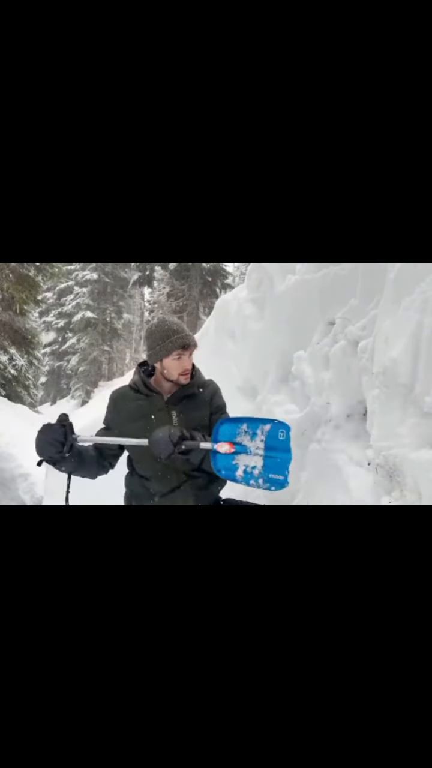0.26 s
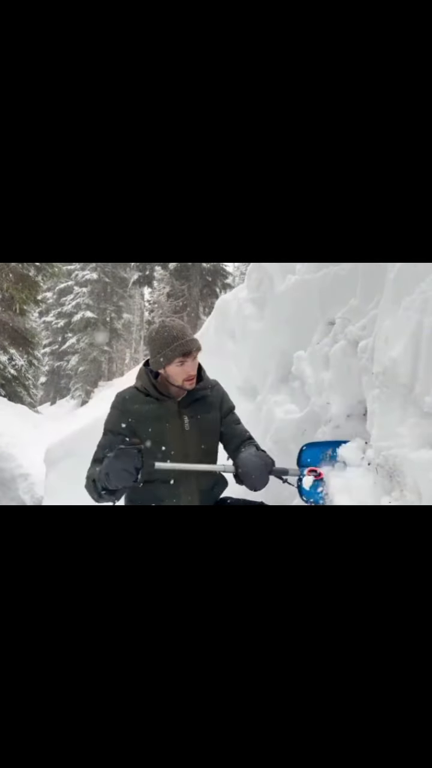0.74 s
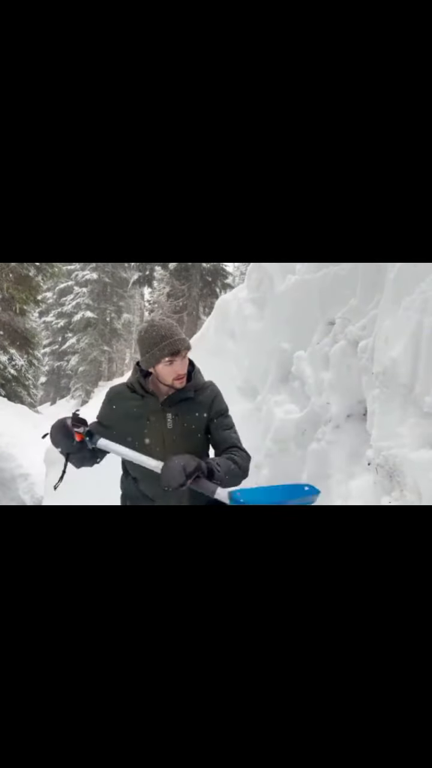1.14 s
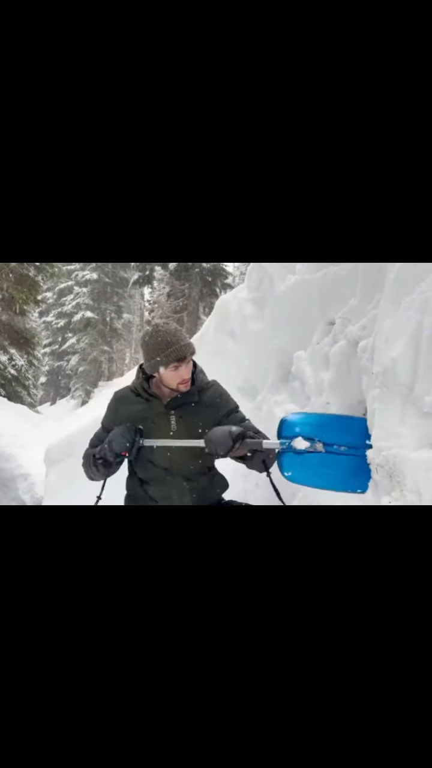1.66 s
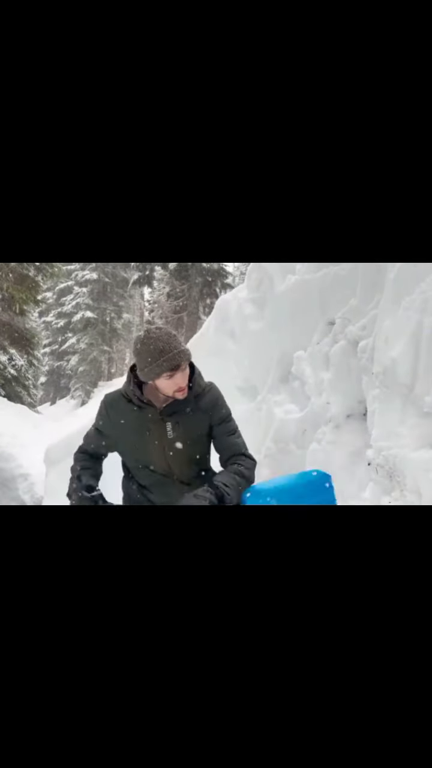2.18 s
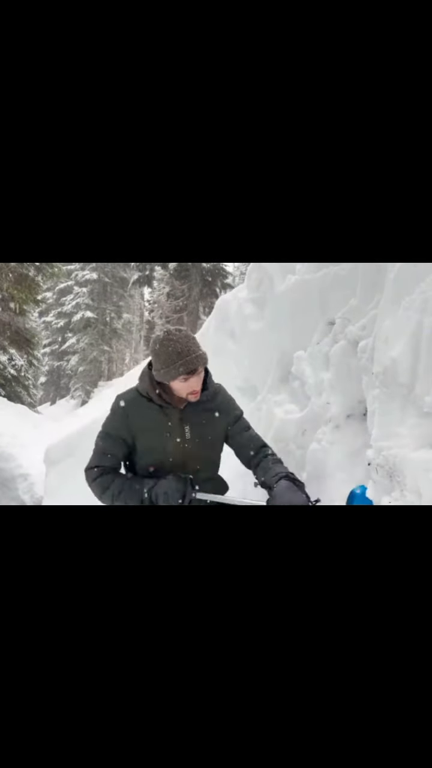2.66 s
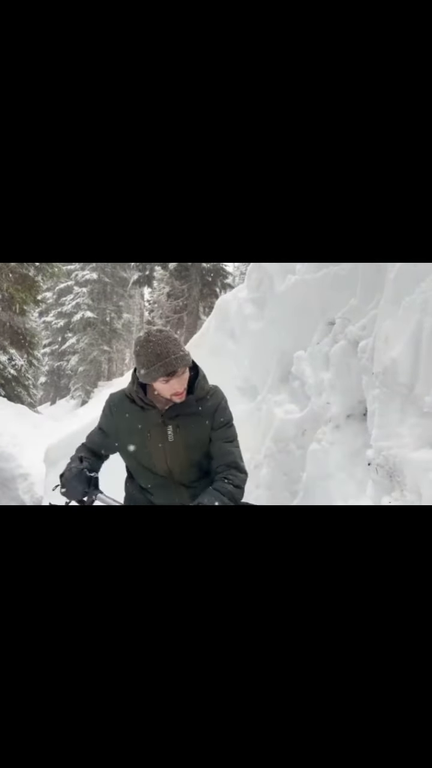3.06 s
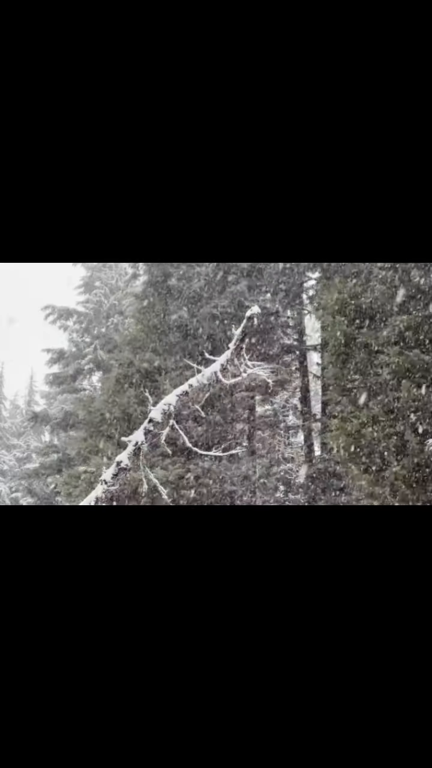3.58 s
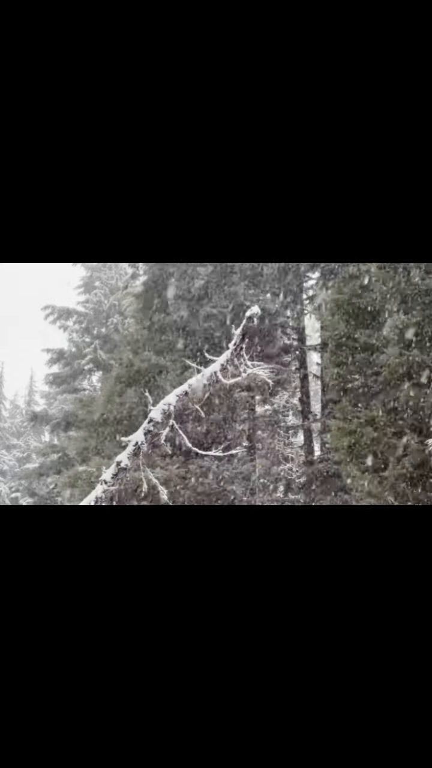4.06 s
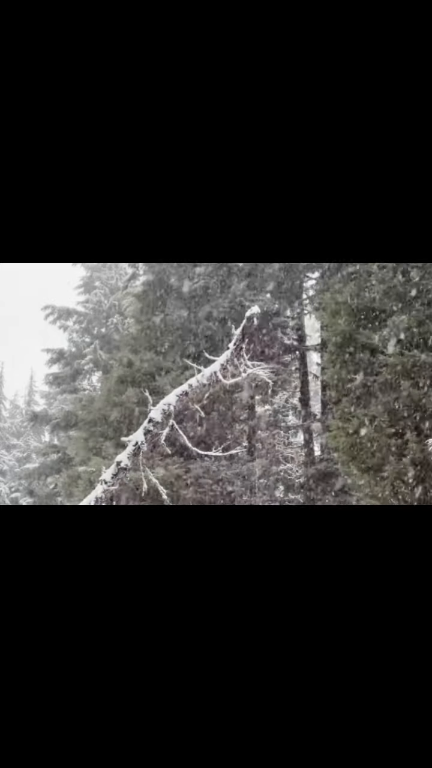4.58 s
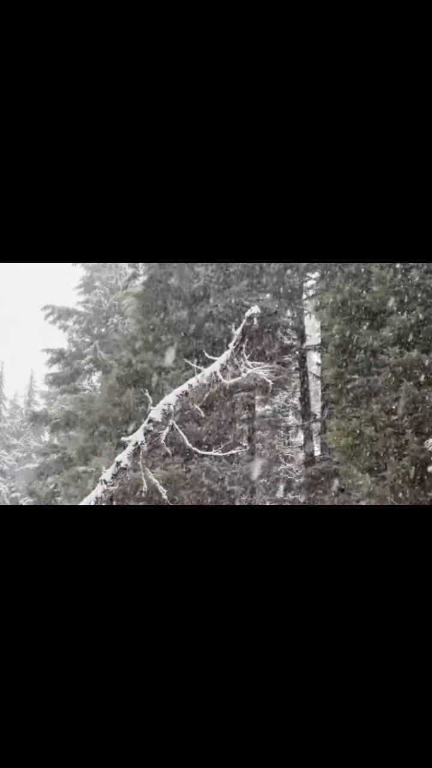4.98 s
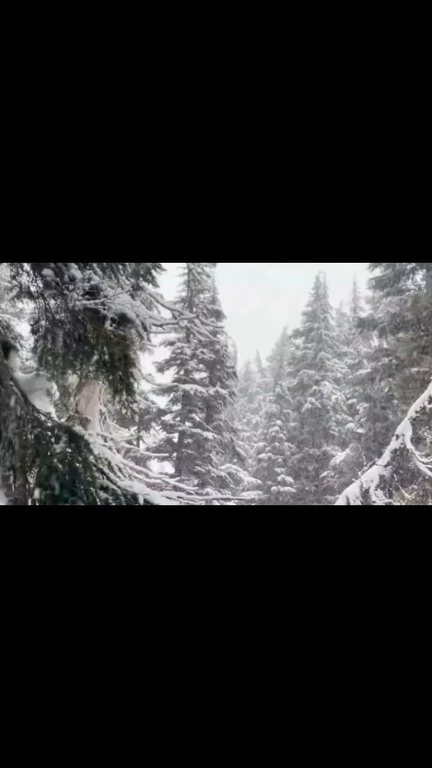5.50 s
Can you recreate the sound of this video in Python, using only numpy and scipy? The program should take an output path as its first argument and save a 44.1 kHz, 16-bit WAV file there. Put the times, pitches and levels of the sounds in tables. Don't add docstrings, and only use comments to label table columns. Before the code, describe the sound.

Outdoors in a still snowy wood, a blade bites packed snow in irregular strokes. Dense crystal crackle, a low boom of the sheet metal and fine hiss move together; dull knocks mark hard lumps and loosened blocks thump softly. Loud hits fall near two, four and five seconds, separated by small trickles. A small close stereo microphone hears it right of centre, the left duller, with watery compressed treble.

```python
import sys
import numpy as np
from scipy import signal
from scipy.fft import rfft, irfft
from scipy.io import wavfile
from scipy.ndimage import uniform_filter1d, minimum_filter1d, map_coordinates

SR = 44100
rng = np.random.default_rng(int(sys.argv[2]) if len(sys.argv) > 2 else 0)


def attenuation_scalar(level_db):
    decades = np.asarray(level_db, float) / 20
    return 10 ** decades


def unload_wav(signal):
    wavfile.write(
        sys.argv[1],
        SR,
        np.round(np.clip(np.atleast_2d(signal).T, -1, 1) * 32767).astype(np.int16),
    )


N = 253134
USUAL_DB = -35


def unit(x):
    return x / np.sqrt(np.mean(x ** 2) + 1e-20)


def along(points, hz):
    f, v = np.transpose(points)
    return np.interp(np.log(hz + 1), np.log(f + 1), v)


def wobble(rate):
    knots = rng.standard_normal(int(N * rate / SR) + 4)
    return map_coordinates(knots, [np.arange(N) * rate / SR])


def bump(s, half):
    return np.exp(-np.minimum(((np.arange(N) / SR - s) / half) ** 2, 50))


def patches(shape, tall, long):
    field = uniform_filter1d(rng.standard_normal(shape), tall, axis=0)
    return unit(uniform_filter1d(field, long, axis=1))


def coloured(x, spectrum, modes=()):
    m = 8192
    hz = np.fft.rfftfreq(m, 1 / SR)
    db = along(spectrum, hz) + sum(g / (1 + (2 * (hz - c) / w) ** 2) for c, w, g in modes)
    cep = irfft(np.log(attenuation_scalar(db) + 1e-6), m)
    cep[1:m // 2] *= 2
    cep[m // 2 + 1:] = 0
    response = irfft(np.exp(rfft(cep)), m)
    return signal.oaconvolve(x, response[None] / np.linalg.norm(response), axes=1)[:, :N]


def cracks(spike_db, clump_db, clumps):
    spikes = np.minimum(rng.exponential(size=N), 5.5)
    size = attenuation_scalar(spike_db * spikes + clump_db * wobble(clumps))
    return unit(size) * rng.standard_normal((2, N))


# start in seconds, length in seconds, from dB, to dB, blade body in dB against the crunch.
CUTS = [(0, 0.17, -31.5, -37, 3), (0.199, 0.14, -38.5, -38, -5.5), (0.44, 0.033, -34.5, -27.5, -15),
        (0.725, 0.015, -32, -27.5, -12), (0.894, 0.088, -46, -24, 1), (1.131, 0.085, -48, -35, -48),
        (1.337, 0.085, -47, -38.5, 1.5), (1.524, 0.13, -41, -20.5, 4.5), (1.66, 0.031, -34, -23, 4),
        (1.878, 0.076, -21, -12.5, 4.5), (2.088, 0.17, -36, -21.5, 5), (2.452, 0.028, -47.5, -37, -7),
        (2.653, 0.023, -37.5, -19.5, -2), (2.684, 0.051, -18, -19, -3), (2.79, 0.12, -39.5, -30.5, 10),
        (3.357, 0.021, -22.5, -14, -6.5), (3.626, 0.064, -29, -21, -3), (3.73, 0.026, -40, -38, -9),
        (3.988, 0.044, -33, -17, -23), (4.096, 0.11, -36.5, -31.5, 8), (4.433, 0.068, -41.5, -33.5, 13),
        (4.496, 0.12, -36.5, -21.5, -3.5), (5.02, .015, -33.5, -25, -14), (5.037, 0.047, -21, -13.5, -25),
        (5.266, 0.064, -38, -26.5, 1.5), (5.573, .014, -29.5, -23.5, -8)]
SLIDES = [(0.13, 0.083, -36, -39.5, 10.5), (0.528, 0.18, -37.5, -45, -5), (0.753, 0.16, -35.5, -48, 7),
          (0.991, 0.15, -25.5, -50, -0.5), (1.21, 0.11, -43, -47, 4.5), (1.439, 0.071, -63, -50, -12),
          (1.702, 0.093, -23, -22, 7), (1.949, 0.079, -9, -38, -4.5), (2.257, 0.15, -26, -46.5, -6.5),
          (2.9, 0.1, -27.5, -27, -4), (3.393, 0.14, -29.5, -31.5, 1), (3.773, 0.17, -39.5, -59, -2.5),
          (4.016, 0.096, -17, -36, 10.5), (4.227, 0.14, -28.5, -49.5, 1), (4.662, 0.1, -41, -49, -2),
          (4.744, 0.21, -54.5, -52, 4), (5.061, 0.09, -12, -29, 5.5), (5.337, 0.063, -29.5, -29.5, -6),
          (5.391, 0.14, -32, -45, -23), (5.593, 0.17, -21, -37.5, -3)]
TRICKLES = [
    (0.354, .07, -56, -48, -20),
    (2.5, 0.12, -55, -54, -6),
    (3.07, 0.21, -57.5, -67.5, -1.5),
    (3.564, 0.038, -49, -36.5, 2),
    (4.35, 0.1, -51, -50.5, -14),
    (5.178, 0.056, -45, -53, 8),
    (1.088, 0.039, -51, -58, -23),
    (3.92, .04, -52, -57, -19),
    (4.97, .03, -54, -49, -5),
]
# time in seconds, added left-right level in dB.
TURN = [
    (0, 1),
    (1.1, 3),
    (1.7, 1),
    (3.2, 2),
    (4.5, 1.5),
    (5.1, 3.5),
]


def effort():
    attack_db_per_s, release_db_per_s = 653, 440
    scatter_s, scatter_share = 0.011, 0.58
    t = np.arange(0, N / SR + .01, 1 / 1000)
    start, length, first, last, depth = np.transpose(CUTS + SLIDES + TRICKLES)[:, :, None]
    moves = first + (last - first) * np.clip((t - start) / length, 0, 1)
    moves = moves - attack_db_per_s * np.maximum(start - t, 0)
    moves = moves - release_db_per_s * np.maximum(t - start - length, 0)
    strongest = moves.max(axis=0)
    level = np.maximum(strongest, -72)
    weight = attenuation_scalar(moves - strongest)
    body = (weight * depth).sum(axis=0) / weight.sum(axis=0)
    keep = np.exp(-t[1] / scatter_s)
    lingering = signal.lfilter([1 - keep], [1, -keep], level - level[0]) + level[0]
    step = -9 + np.interp(t, *np.transpose(TURN)) - 0.05 * (level - USUAL_DB)
    step = np.clip(step + scatter_share * (lingering - level), -16, -2)
    return [np.interp(np.arange(N) / SR, t, curve) for curve in (level, body, step)]


# time in seconds, change in dB,
# half length in seconds.
SLIPS = [(0.107, 9.5, 0.022), (0.567, 5.5, 0.014), (0.657, 4, 0.0068), (0.92, 5.5, 0.038),
         (1.051, 4.5, 0.016), (1.166, 4, .0099), (1.281, 6, 0.012), (1.46, 16.5, 0.007),
         (1.49, 10.5, 0.0048), (2.146, 4.5, 0.026), (2.231, 3, 0.0042), (2.296, 4.5, 0.015),
         (2.544, 4, 0.0061), (2.656, 8, 0.0058), (2.692, 2, 0.007), (3.376, 3.5, 0.0058),
         (3.515, 2.5, .015), (3.777, 6.5, .003), (0.3, 4.5, .01), (0.736, 6, .006), (.057, 2.5, .004),
         (5.019, 4, 0.0043), (3.099, 12.5, 0.019), (3.165, 8, 0.015), (3.321, 6, 0.0083),
         (4.622, 5.5, 0.01), (4.747, 3, 0.0093), (4.9, 7, 0.0054), (4.813, 6, .008), (5.01, -1, 0.0086),
         (5.6, 5.5, 0.014), (5.692, 8, 0.014)]
# time in seconds, change in dB, half length in seconds.
CATCHES = [(1.174, -11, 0.0081), (1.36, -8, 0.021), (1.519, -6, 0.014), (1.612, -9.5, 0.0085),
           (1.756, -10.5, 0.014), (2.198, -2.5, 0.013), (4.137, -6.5, 0.0066), (2.209, -2, 0.005),
           (2.703, -1.5, 0.0073), (2.252, -2.5, 0.014), (3.4, -0.5, 0.0095), (3.472, -2.5, .012),
           (2, -2, .008), (0.039, -3.5, .01), (2.828, -12, 0.0063), (3.286, -7, 0.041), (5.451, -8, 0.019),
           (5.669, -3.5, 0.016)]


def jolts():
    return 1.32 * wobble(35) + sum(db * bump(s, half) for s, db, half in SLIPS + CATCHES)


# time in seconds, peak in dB,
# pitch in Hz, half length in seconds.
HUMS = [(0.01, -17, 439, 0.0061), (0.107, -18.5, 405, 0.0068), (0.13, -26, 329, 0.014),
        (.215, -19.5, 89.3, 0.0062), (0.47, -26.5, 52.5, 0.02), (0.561, -44, 350, 0.004),
        (2.49, -24, 85, 0.0072), (1.331, -36, 250, .02), (3.593, -33, 160, 0.0059),
        (2.488, -26.5, 190, .006), (2.693, -14.5, 280, 0.0048), (0.164, -33, 330, .008),
        (0.76, -22.5, 370.5, 0.0065), (2.28, -31, 330, .007), (2.774, -32, 299, .007),
        (3.102, -44.5, 802, 0.0061), (3.153, -61, 802, 0.033), (3.741, -27.5, 813, 0.0088),
        (3.757, -25.5, 800, 0.015), (4.362, -51, 814, 0.019), (4.53, -24, 170.4, 0.0064),
        (5.357, -35.5, 829, 0.054), (4.819, -52, 1760, .01), (5.604, -27.5, 283.5, 0.019),
        (5.678, -33, 299.5, 0.019),
        (0.19, -30, 238, 0.005), (0.567, -37, 439, 0.0044), (0.95, -35, 390, 0.0047),
          (0.966, -34, 398, 0.007), (0.989, -28, 446, 0.0049), (1.664, -24, 264, 0.0083),
          (1.696, -25, 294, 0.0076), (1.72, -16, 328, 0.007), (1.803, -19, 312, 0.0059),
          (1.896, -17, 337, 0.0057), (1.942, -19, 466, 0.0057), (1.978, -19.5, 478, 0.0064),
          (2.137, -20.5, 409, 0.0057), (2.154, -25.5, 515, 0.0061), (2.238, -24, 359, 0.006),
          (2.257, -29, 328, 0.0098), (2.73, -29, 358, 0.0045), (2.743, -27, 436, 0.007),
          (2.905, -28, 307, 0.007), (2.941, -29, 525, 0.0056), (3.38, -22.5, 358, 0.007),
          (3.527, -37, 503, 0.007), (3.663, -29, 385, 0.0054), (3.696, -26, 382, 0.007),
          (4.038, -27, 387, 0.007), (4.229, -21, 276, 0.0063), (4.266, -32, 347, 0.007),
          (4.47, -37, 391, 0.0061), (4.566, -33, 407, 0.0087), (4.584, -26, 463, 0.007),
          (4.627, -23, 422, 0.0061), (5.074, -25, 375, 0.0062), (5.12, -29, 445, 0.0059),
          (5.27, -35, 343, 0.007), (5.321, -23.5, 375, 0.0038), (5.651, -27, 319, 0.007)]


def hums():
    out, t = np.zeros(N + SR), np.arange(-SR // 4, SR // 4) / SR
    for s, db, hz, half in HUMS:
        swell = np.exp(-np.minimum((t / half) ** 2, 50))
        out[round(s * SR):][:len(t)] += attenuation_scalar(db) * swell * np.sin(2 * np.pi * hz * (t + s))
    return out[SR // 4:][:N]


# time in seconds, peak in dB.
SNAPS = [(0.054, -26), (0.0626, -30), (0.1126, -29), (0.1353, -31), (0.4542, -14.5), (0.467, -24),
         (0.564, -32), (0.7424, -12), (0.9976, -20), (1.1997, -29), (1.281, -34), (1.38, -31), (1.489, -33),
         (1.5372, -30), (1.5881, -26), (1.709, -20), (1.768, -23), (1.8676, -20), (1.8873, -24),
         (1.9061, -16), (1.96, -4), (2.1733, -24), (2.2173, -11.5), (2.2363, -16), (2.291, -27),
         (2.48, -22), (2.6888, -13), (2.7166, -8), (2.733, -19), (2.8893, -24), (2.9514, -24),
         (2.9908, -29), (2.999, -28), (3.006, -27), (3.3765, -21), (3.599, -23), (3.6661, -20),
         (3.7564, -22.5), (4.0156, -11), (4.0812, -21), (4.1562, -18), (4.4307, -25), (4.5176, -21),
         (4.5637, -19), (4.569, -17.5), (4.5788, -27), (4.619, -10.5), (5.082, -16), (5.311, -26),
         (5.3812, -25), (5.3964, -40), (5.4761, -30), (5.5952, -19), (5.6394, -22), (5.648, -31),
         (5.6889, -23)]


def snaps():
    bite_db, t60_s = -2.5, 0.0088
    bite, t = np.zeros(N + SR), np.arange(SR // 20) / SR
    for s, db in SNAPS:
        bite[round(s * SR):][:len(t)] += attenuation_scalar(db + bite_db - 60 * t / t60_s)
    return bite[:N]


# time in seconds, peak in dB, ring pitch in Hz,
# ring time to fall 60 dB in seconds, bite of snow in dB against the ring.
KNOCKS = [(1.377, -33, 252, 0.04, -0.5), (1.488, -51, 807, 0.01, 8), (1.588, -17, 220, 0.022, -24),
          (1.867, -9.5, 500, 0.023, -30), (2.084, -27, 420, 0.027, -35), (2.2168, -6.5, 400, 0.013, -16.5),
          (2.481, -28.5, 260, 0.018, 9), (2.8435, -15, 462, 0.011, -20), (3.35, -22, 980, 0.033, -1),
          (3.601, -23, 365, 0.021, -6), (3.754, -20, 766, 0.014, -2), (4.081, -2.5, 268, 0.023, -28),
          (4.381, -46, 775, 0.022, 17), (4.431, -26, 730, 0.026, -22)]
CHOPS = [(.055, -22, 343, 0.039, -5), (0.45, -22, 146, 0.031, -1.5), (0.724, -24.5, 390, 0.054, -1),
         (0.7413, -10, 320, 0.03, 1), (1.537, -25.5, 260, 0.054, 0), (1.627, -19, 265, 0.023, 0),
         (1.767, -12.5, 192, 0.057, -20), (2.661, -22, 970, 0.033, -3), (2.686, -16.5, 304, .036, -1),
         (4.012, -20, 250, .026, -2), (4.157, -4.5, 277, 0.024, -23.5), (4.515, -6, 387, 0.016, -12),
         (5.032, -25, 730, .03, 5), (5.478, -39, 366, 0.049, 15), (5.574, -33, 860, .02, -2)]


def knocks():
    glance_t60_s, break_t60_s = 0.033, 0.17
    rings, bite, t = np.zeros(N + SR), np.zeros(N + SR), np.arange(SR // 4) / SR
    blows = [(*row, glance_t60_s) for row in KNOCKS] + [(*row, break_t60_s) for row in CHOPS]
    for s, db, hz, t60, bite_db, bite_t60 in blows:
        here = slice(round(s * SR), round(s * SR) + len(t))
        phase = 2 * np.pi * hz * (0.724 * t + 1.217 * 0.00327 * (1 - np.exp(-t / 0.003)))
        fade = -60 * (t / t60) ** 1.71
        rings[here] += attenuation_scalar(db - 0.5 + fade) * np.sin(phase) * (1 - np.exp(-t / 0.0013))
        contact = (1 - t / 0.0005) * np.exp(-t / 0.0003) * (1 - np.exp(-t / .0001))
        rings[here] += attenuation_scalar(db - 13) * contact
        crush = 1.08 * attenuation_scalar(-60 * t / bite_t60) + attenuation_scalar(-60 * t / 0.0027)
        bite[here] += attenuation_scalar(db + bite_db - 11.5) * crush
    return rings[:N], bite[:N]


# centre in Hz, width in Hz, boost in dB.
BLADE = [(307, 630, 5), (796, 56, 4), (1760, 120, 1.5), (4840, 270, 4), (5310, 250, 1.5)]


def on_blade(x, spectrum):
    return coloured(x, spectrum, BLADE)


# frequency in Hz, level in dB per Hz.
CRUNCH = [(240, -32.5), (400, -11), (484, -8), (1060, -2.5), (1200, -5), (1720, -3), (3450, -10),
          (5000, -16), (6500, -42), (11000, -120)]


def crunch(push, bite, snap, click):
    force = push + bite + snap
    return on_blade(force * cracks(3.3, 0.47, clumps=170) + attenuation_scalar(12.5) * click, CRUNCH)


# frequency in Hz, level in dB per Hz.
BODY = [(59, -31), (100, -12), (140, -9), (306, -1.5), (654, -7), (786, -8.5), (1000, -7), (1300, -28),
        (2200, -120)]


def blade_body(push, bite, body):
    force = attenuation_scalar(body - 2.0) * push + 0.26 * bite
    return on_blade(force * cracks(1.73, 1.06, clumps=90), BODY)


# frequency in Hz, level in dB per Hz.
HISS = [(1470, -25), (2500, -7), (3140, -2.5), (3420, -12.5), (3780, -11), (4370, -4), (4860, -3),
        (5450, 0.5), (6700, -10.5), (9100, -13), (10500, -27.5), (10800, -37), (11800, -34), (12500, -28.5),
        (15500, -54)]


def fizz(push, bite, snap, click, level, body):
    hiss_db = -5 - 0.0981 * np.maximum(level - USUAL_DB, -22) - 0.28 * body
    force = attenuation_scalar(hiss_db + 1.0) * push + 0.79 * bite + 0.35 * snap
    return on_blade(force * cracks(2.1, 0.98, clumps=210) + attenuation_scalar(-9.0) * click, HISS)


# frequency in Hz, level in dB per Hz.
THUMP = [(12, -46.5), (20, -24), (86, 6), (140, -1.5), (250, -2), (320, -48), (550, -120)]
# time in seconds, peak in dB, half length in seconds.
LUMPS = [(0.067, -28, 0.026), (0.189, -29, 0.03), (0.476, -44.5, 0.12), (0.79, -46, 0.048),
         (1.32, -46.5, 0.038), (1.687, -31.5, 0.089), (1.944, -39, 0.069), (2.496, -37, 0.0093),
         (2.696, -40, 0.056), (3.364, -45, 0.025), (4.063, -34.5, 0.091), (4.194, -26, 0.08),
         (4.9, -48, 0.017), (0.284, -47, 0.029), (1.55, -48, 0.029), (5.3, -50, 0.034), (4.624, -50, 0.017),
         (4.494, -39, 0.048), (4.83, -60, 0.014), (5.628, -52, 0.073)]


def thumps(level):
    rumble = attenuation_scalar(-48.5 + 0.35 * (level - USUAL_DB))
    drops = sum(attenuation_scalar(db) * bump(s, half) for s, db, half in LUMPS)
    return coloured((rumble + drops) * cracks(1.24, 1.5, clumps=20), THUMP)


def shovel():
    level, body, _ = effort()
    push = attenuation_scalar(level + jolts() - 1.0)
    rings, bite = knocks()
    snap = snaps()
    click = np.maximum(np.diff(bite + 0.54 * snap, prepend=0), 0)
    snow = crunch(push, bite, snap, click) + fizz(push, bite, snap, click, level, body)
    return snow + blade_body(push, bite, body) + thumps(level) + rings + hums()


# frequency in Hz, likeness from 0 to 1.
ALIKE = [(60, 1), (130, 0.21), (290, 0.74), (640, 0.067), (1410, 0.31), (3100, 0.145), (4500, 0.37),
         (6820, 0.36), (15000, 0.25)]
# frequency in Hz, share of the left-right step.
SHADOW = [(30, .05), (60, 0.5), (200, 0.96), (700, 1.74), (2400, 1.56), (4000, 0.44), (8000, 0.039)]


def microphones(paths):
    hz, at, z = signal.stft(paths, SR, nperseg=256)
    near, far = z * attenuation_scalar(1.77 * patches(z.shape[1:], 3, 10) - 2.5)
    moment = np.minimum((at * SR).astype(int), N - 1)
    step = 1.03 * effort()[-1][moment] * along(SHADOW, hz)[:, None]
    alike = np.clip(along(ALIKE, hz), 0, 1)[:, None]
    left = attenuation_scalar(step) * (alike * near + np.sqrt(1 - alike ** 2) * far)
    level = 2 / np.sqrt(1 + attenuation_scalar(2 * step) + 2 * alike * attenuation_scalar(step))
    return signal.istft([left * level, near * level], SR, nperseg=256)[1][:, :N]


# frequency in Hz, level in dB per Hz.
FLOOR = [(15, -15.5), (25, 3.5), (118, -10), (560, -36), (1020, -39.5), (4960, -19), (7040, -19.5),
         (8820, -19.5), (10000, -20), (13000, -71), (22000, -120)]


def forest():
    return attenuation_scalar(-55.0) * unit(coloured(rng.standard_normal((2, N)), FLOOR))


def scene():
    return microphones(shovel()) + forest()


def limited(x, top):
    need = np.minimum(1, top / (abs(x).max(axis=0) + 1e-9))
    return x * uniform_filter1d(minimum_filter1d(need, size=441), size=220)


# start in seconds, stop in seconds, pitch in Hz,
# hiss kept on the left in dB, hiss kept on the right in dB.
TONES = [(0, .68, 8786, -28, -28), (1.54, 2.15, 8786, -26, -24), (3.38, 3.93, 8786, -24, -24),
         (5.04, 5.56, 8786, -30, -30), (.79, 1.22, 8786, -14, -14), (1.63, 1.69, 7958, -16, -14),
         (1.63, 1.69, 7545, -10, -12), (0, .68, 6718, -4, -11), (1.56, 1.78, 6718, -24, -24),
         (1.78, 2.07, 6718, -8, -9), (.82, 1.15, 7132, -8, -12), (1.57, 2.15, 7132, -6, -10),
         (.55, .68, 7132, -4, -8), (3.45, 3.62, 5891, -3, -12), (5.05, 5.56, 5891, -2, -12),
         (1.64, 1.92, 6304, -8, -12), (5.03, 5.08, 6304, -10, -16), (5.08, 5.74, 6304, -2, -6),
         (3.45, 3.62, 6304, -1, -8), (5.58, 5.74, 8371, -13, -10), (4.51, 4.57, 7545, -8, -16),
         (5.04, 5.56, 11749, -30, -30), (3.42, 3.6, 11749, -28, -28), (1, 1.12, 11749, -22, -22),
         (.11, .3, 11749, -14, -14), (1.85, 1.93, 11749, -14, -22)]


def swap_tones(z, hz, at):
    t, tones = np.arange(N) / SR, np.zeros((2, N))
    for start, stop, tone_hz, *kept_db in TONES:
        band, on = abs(hz - tone_hz) < 215, (at > start) & (at < stop)
        coming = np.clip(1.2 + .9 * np.interp(at, t, wobble(16)), .2, 3)
        kept = np.minimum(attenuation_scalar(np.array(kept_db)[:, None] * coming), 1)
        power = on * (1 - kept ** 2) * np.sum(abs(z[:, band]) ** 2, axis=1)
        power = power * attenuation_scalar(-8.0 * (tone_hz > 11300))
        lag = np.array([[np.pi / 2 * (tone_hz > 8000)], [0]])
        swell = np.array([np.interp(t, at, np.sqrt(p)) for p in power])
        tones += attenuation_scalar(3.5) * swell * np.sin(2 * np.pi * tone_hz * t - lag)
        z[:, band] *= np.where(on, kept, 1)[:, None]
    return tones


def rebuilt_treble(x):
    hz, at, z = signal.stft(x, SR, nperseg=1024)
    tones = swap_tones(z, hz, at)
    size = abs(z).mean(axis=0)
    high = hz[:, None]
    top = hz > 11300
    z[:, top] *= (size[top].mean(axis=0) / attenuation_scalar(-85.0)) ** -.45
    chance = attenuation_scalar(6.2 * patches(size.shape, 12, 4) + 8.1 * patches(size.shape, 1, 5))
    heard = 20 * np.log10(size[(hz > 5000) & (hz < 9000)].mean(axis=0) + 1e-9)
    rising = np.clip(heard - np.roll(heard, shift=3), 0, 15) * np.clip((heard + 70) / 14, 0, 1)
    chance *= attenuation_scalar(.8 * rising)
    z[:, top] *= attenuation_scalar(0.25 * rising * np.clip((hz[top, None] - 11000) / 2500, 0, 1))
    weak = uniform_filter1d(size, size=9, axis=0) ** .75 * chance < attenuation_scalar(-70)
    lines = patches(size.shape, 1, 4) + .04 * rising > .6
    dropped = top[:, None] & (weak | ~lines)
    z[:, top] *= attenuation_scalar(4.0)
    dropped |= high > np.minimum(13750 + 250 * np.maximum(rising - 2, 0), 15700)
    starved = patches(size.shape, 7, 7) - high / 6000 < -2.75
    dropped |= (high > 5500) & starved
    loud = size[(hz > 8000) & (hz < 9700)].mean(axis=0) * attenuation_scalar(.4 * rising) > attenuation_scalar(-62)
    quiet_edge = np.where(patches(size.shape, 1, 15)[0] > .7, 9150, 9700)
    gap = (high > np.where(loud, 10350, quiet_edge)) & (high < 11300)
    dropped |= gap & ~(lines & (rising > 12.5))
    return signal.istft(z * ~dropped, SR, nperseg=1024)[1][:, :N] + tones


def band_limit(x):
    return signal.sosfilt(signal.butter(12, 15690, fs=SR, output="sos"), x)


def record(dry):
    mix = rebuilt_treble(limited(dry, 0.89))
    return band_limit(mix)


dry = scene()
out = record(dry)
unload_wav(out)
```